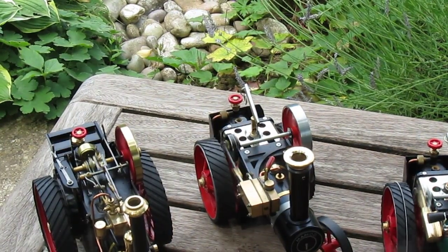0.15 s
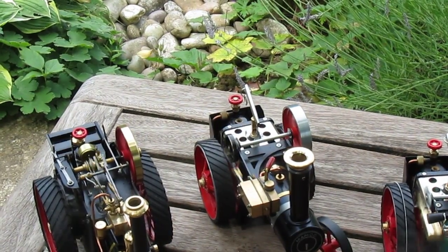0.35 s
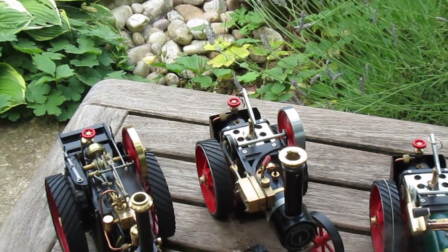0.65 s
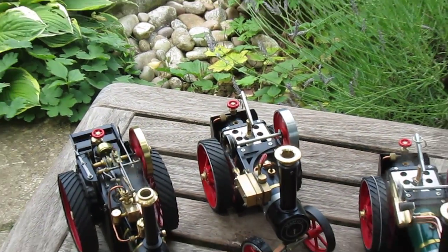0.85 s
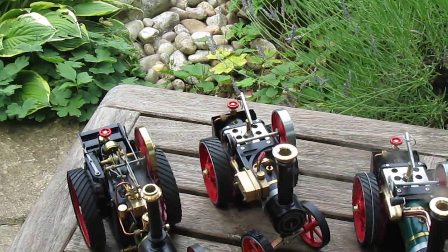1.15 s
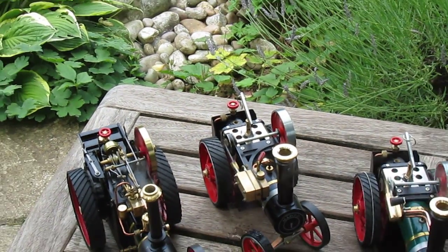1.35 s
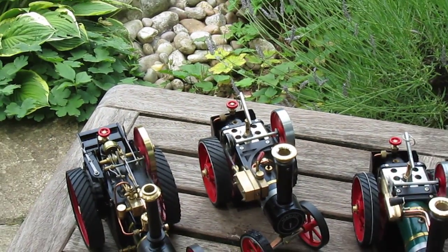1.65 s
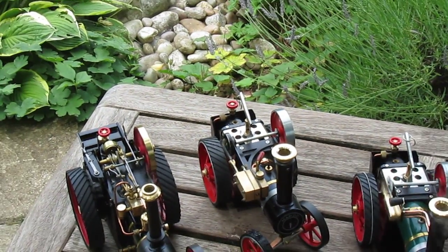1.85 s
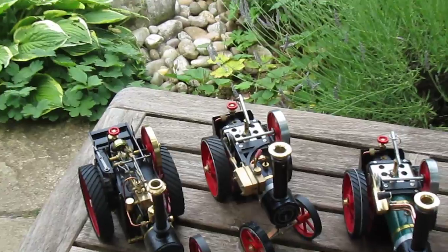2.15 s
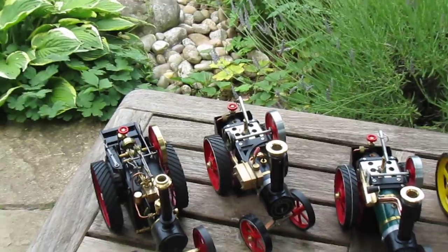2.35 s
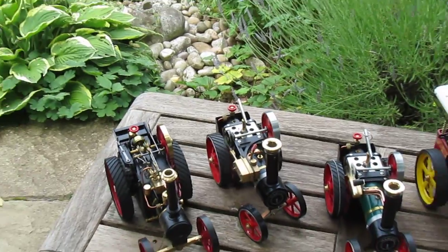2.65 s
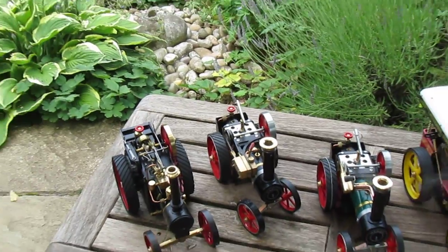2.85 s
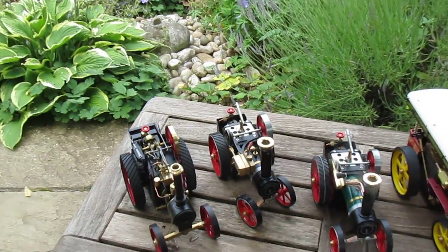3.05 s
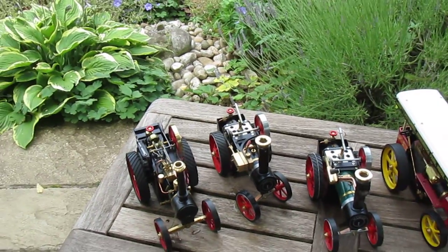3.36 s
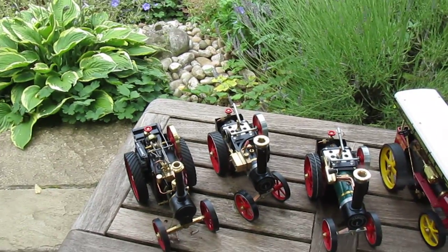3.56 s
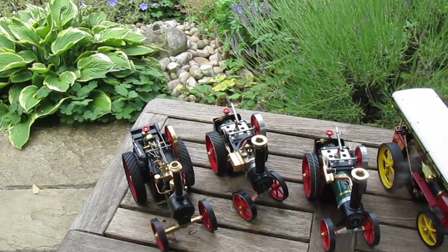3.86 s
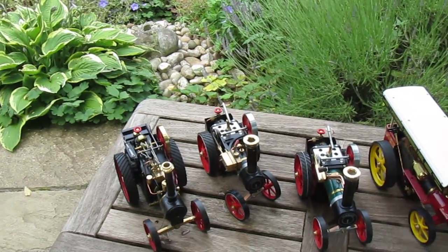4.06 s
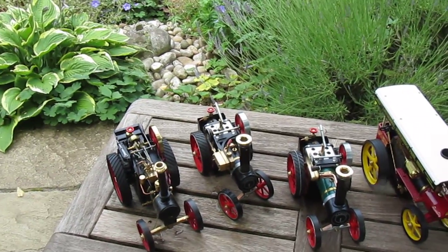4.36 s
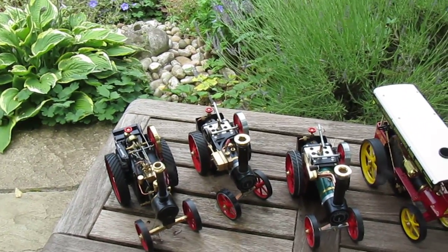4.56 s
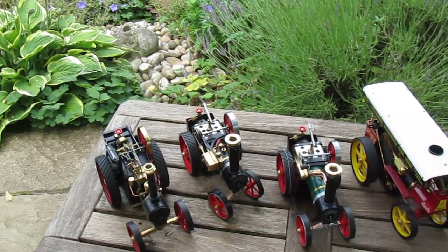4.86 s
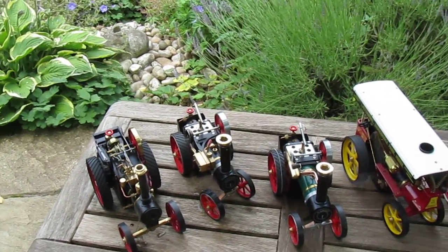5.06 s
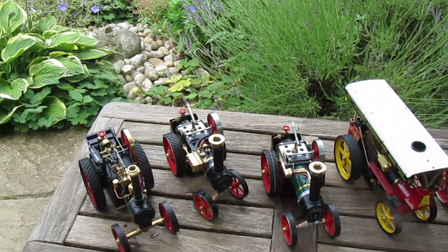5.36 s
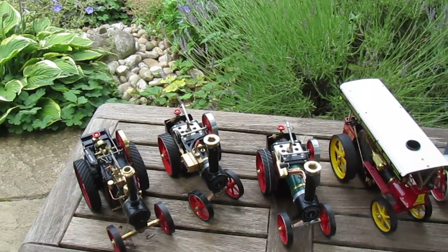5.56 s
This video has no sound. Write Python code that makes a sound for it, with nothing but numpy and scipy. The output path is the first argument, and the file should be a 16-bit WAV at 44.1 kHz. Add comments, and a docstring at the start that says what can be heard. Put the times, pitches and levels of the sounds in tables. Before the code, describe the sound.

Several small steam engines run continuously on a wooden table outdoors, heard close and dry in stereo, leaning slightly right. Their strokes merge into a buzzing metallic rattle: one engine ticks lightly and brightly at about 35 beats a second, another clacks at about 28, over irregular gear chatter, a hollow drone and leaking steam. A stronger steam jet hisses until 0.3 s, from 1.1 to 1.95, softly from 2.75 to 3.2, then steadily from 3.4. A very thin high squeak chirps at 0.15 s, with others at 5.0 and 5.55. Short low wind bumps come around 1.0-1.2 and 1.8-1.9 s; the bass drops out after them and creeps back. From about 3 s the clacking engine speeds up to 32 beats, growing closer and brighter. Hard ringing knocks become frequent, and the boards' low hum swells, changing tone near 4.8 s. Everything is still running at the end.

```python
"""Model steam engines tick over on a slatted table: one clacks, one ticks steadily, the rest blur into rattle,
drone and steam. Thin squeaks come at the start and near the end, and a steam jet hisses on and off. Gusts of
0.97-1.87 s buffet the microphone ports; around them the bass falls and creeps back. From about 3 s the clacking
engine speeds up, its clack still coming forward; the boards' hum swells and changes tone.
Excited resonance makes the sound: impulse trains and noise drive decaying modes and fixed colours."""
import sys
import numpy as np
from scipy import signal
from scipy.fft import rfft, irfft, next_fast_len
from scipy.io import wavfile
from scipy.ndimage import map_coordinates

SR = 44100
rng = np.random.default_rng(int(sys.argv[2]) if len(sys.argv) > 2 else 0)


def persist_wave(psi):
    """Save psi, clipped to +-1, as 16-bit WAV."""
    counts = np.round(np.clip(psi, -1, 1) * 32767).astype(np.int16)
    wavfile.write(sys.argv[1], SR, np.atleast_2d(counts).T)


N = 251370

# speed of the fast engine: t/s, stroke rate/Hz
FAST_SPEED = [(0.0, 28.623), (0.5, 28.557), (1.0, 28.374), (1.5, 29.14), (2.0, 28.705), (2.4, 28.326),
              (2.8, 28.882), (3.2, 29.819), (3.6, 30.222), (4.0, 30.439), (4.4, 31.365), (4.8, 32.093),
              (5.2, 32.358), (5.7, 32.316)]
# common course of the low sounds: t/s, relative level/dB
LOW_COURSE = [(0, -9), (1.052, -4.5), (1.068, -12), (1.3, -19), (1.8, -13.5), (2.2, -20.5), (2.6, -16.5),
              (3, -11), (4, -3.5), (4.7, -0.5), (5.7, 0.5)]
# passage from the first listening place to the last: t/s, share of the way
PLACE_COURSE = [(0, 0), (3, 0), (4.9, 1), (5.7, 1)]


def amp(db):
    """Level definition: amplitude ratio = 10^(dB/20)."""
    return 10 ** (np.asarray(db) / 20)


def unit(x):
    """Normalisation to a mean square of one."""
    return x / np.sqrt(np.mean(x ** 2) + 1e-20)


def along(points, hz):
    """Spectral interpolation: (f/Hz, value) points joined on a logarithmic frequency axis."""
    f, v = np.transpose(points)
    return np.interp(np.log(hz + 1), np.log(f + 1), v)


def curve(rows):
    """Temporal interpolation: (t/s, value) points joined linearly, one value per sample."""
    s, v = np.transpose(rows)
    return np.interp(np.arange(N) / SR, s, v)


def wobble(rate):
    """Band-limited fluctuation: a smooth curve through random knots, rate of them a second."""
    knots = rng.standard_normal(int(N * rate / SR) + 4)
    return map_coordinates(knots, [np.arange(N) * rate / SR])


def filtered(x, response):
    """Convolution theorem: the spectrum of x times a complex response of frequency."""
    m = next_fast_len(N + SR // 2)
    hz = np.fft.rfftfreq(m, 1 / SR)
    return irfft(rfft(x, m) * response(hz), m)[..., :N]


def modes(rows, f, order=1):
    """Modal superposition: causal (f/Hz, width/Hz, level/dB) resonances; higher orders have steeper skirts."""
    return sum((amp(db) * 1j * f * w / (c * c - f * f + 1j * f * w)) ** order for c, w, db in rows)


def stereo(gate, colour):
    """Partial coherence: enveloped noise, coloured, in a mid-side mix that sets the likeness of the ports."""
    # likeness of left and right: f/Hz, correlation coefficient
    likeness = [(60, .5), (130, .8), (290, .82), (640, .96), (1410, .96), (3100, .97), (6800, .76),
                (10000, .62), (15000, .5)]

    def mid_and_side(hz):
        angle = np.arccos(np.clip(along(likeness, hz), -1, 1)) / 2
        return colour(hz) * [np.cos(angle), np.sin(angle)]

    mid, side = filtered(gate * rng.standard_normal((2, N)), mid_and_side)
    return unit(np.array([mid + side, mid - side]))


def metal(own):
    """Source-filter principle: a source's own colour times the shared colour and the frames' resonances."""
    # colour shared by all engines: f/Hz, spectral level/dB
    shared = [(330, -55), (560, -15.5), (690, -2.5), (950, -5), (1460, 2), (1590, -2), (1910, -0.5),
              (2160, -9), (2700, -8.5), (3330, -7.5), (3720, -15), (6140, -10), (11200, -22.5),
              (12800, -20), (15600, -41.5)]
    # brass and steel frames: f/Hz, width/Hz, lift/dB
    frames = [(1297, 7.7, 3), (1437, 11, -5), (1505, 8.7, 2), (1847, 9.9, 5), (1927, 33, 8),
              (2150, 140, -12), (2325, 197, 9), (4436, 9, 5.5), (5640, 330, -6.5), (6080, 86, -2.5),
              (7900, 55, 4), (8040, 71, -19), (8690, 17, 1.5), (12800, 280, -26)]
    return lambda hz: amp(along(shared, hz) + along(own, hz)) * (1 + modes(frames, hz))


def strokes(speed, phases):
    """Phase integration: a unit impulse each time the crank passes a phase, in strokes of a two-stroke turn."""
    travelled = np.cumsum(curve(speed)) / SR  # strokes
    return sum(np.diff(np.floor((travelled - p) / 2), prepend=-1) for p in phases)


def knocking(rate):
    """Frequency-modulated pulse train: impulses about rate a second, unevenly spaced but never bunched."""
    speed = rate * amp(2.5 * wobble(25))
    return np.diff(np.floor(np.cumsum(speed) / SR), prepend=0)


def impulses(rows):
    """Isolated excitation: one impulse per (t/s, strength/dB) row."""
    blows = np.zeros(N)
    for s, db in rows:
        blows[round(s * SR)] = amp(db)
    return blows


def bursts(blows, t60, scatter_db, rise=0.00029):
    """Exponential decay: each blow, at a random strength, starts an envelope; t60 and rise in s."""
    t = np.arange(SR // 20) / SR
    decay = amp(-60 * t / t60) * (1 - np.exp(-t / rise))
    sized = blows * amp(scatter_db * rng.standard_normal(N))
    return np.abs(signal.fftconvolve(sized, decay)[:N])


def ringing(blows, scatter_db, rise=0.0027):
    """Free vibration: each blow rings the bed plate's modes, each at a random strength and sign."""
    # engine bed plate: f/Hz, level/dB, t60/s
    bed_plate = [(1420, -7, .028), (1840, -2, .034), (2050, 0, .026), (2350, -8, .022)]
    t = np.arange(SR // 15) / SR
    total = np.zeros(N)
    for hz, db, t60 in bed_plate:
        strength = amp(scatter_db * rng.standard_normal(N)) * rng.choice([-1, 1], N)
        envelope = amp(db - 60 * t / t60) * (1 - np.exp(-t / rise))
        mode = envelope * np.sin(2 * np.pi * hz * t)
        total += signal.fftconvolve(blows * strength, mode)[:N]
    return total


def wind():
    """Turbulent pressure: eddies press on one port and pull on the other, in gusts over a light breeze."""
    # gusts on the ports: t/s, level/dB
    gusts = [(.97, -29), (1.11, -40), (1.17, -35), (1.77, -46), (1.865, -37)]
    # colour of the buffeting: f/Hz, spectral level/dB
    buffet = [(20, -18), (45, -3), (80, -1), (150, 1.5), (300, -3), (900, -34)]
    gust_s = .022  # time constant on each side of a gust
    breeze_db, breeze_follows = -48, .8  # level at 0 dB of the lows; dB per dB of the lows
    t = np.arange(N) / SR
    breeze = amp(breeze_db + breeze_follows * curve(LOW_COURSE))
    push = breeze + sum(amp(db) * np.exp(-np.abs(t - s) / gust_s) for s, db in gusts)
    opposed, alike = filtered(rng.standard_normal((2, N)), lambda hz: amp(along(buffet, hz)))
    return push * unit(np.array([opposed + .4 * alike, .4 * alike - opposed]))


def squeaks():
    """Tone burst: short thin sines under Gaussian envelopes, off to one side."""
    # squeaks: t/s, level/dB (peak, before the two side gains), f/Hz
    squeak_rows = [(.145, -43, 11420), (.755, -73, 11420), (5.03, -45, 11500), (5.555, -54, 11430)]
    t = np.arange(N) / SR
    tone = sum(amp(db) * np.exp(-((t - s) / 0.015) ** 2) * np.sin(2 * np.pi * hz * t)
               for s, db, hz in squeak_rows)
    return tone * np.array([[1.3], [-.3]])  # left, right


def table():
    """Forced vibration: the boards shake, and hum where an overtone of the stroke rate meets a mode."""
    # board modes: f/Hz, width/Hz, level/dB at the first place, level/dB at the last
    boards = [(64, 16, -16, -11), (113, 14, -3.5, -9), (127, 12, -3, -3), (150, 24, -.5, -4),
              (170, 20, -4, -6), (194, 9, -2, -.5), (222, 20, -5, -1), (258, 18, 0, -5),
              (288, 18, .5, -1.5), (318, 22, 0, -2.5), (345, 20, -2, -6), (452, 20, -9, -4)]
    # change of the boards' tone: t/s, share of the way
    settling = [(0, 0), (3, 0), (4.79, .45), (4.86, 1), (5.7, 1)]
    # hum of the boards: t/s, level/dB
    hum_level = [(0, -45), (1.05, -44), (1.1, -49), (1.5, -51.5), (2.1, -53.5), (2.6, -50), (3.2, -43),
                 (4, -37), (4.78, -39), (4.86, -38.5), (5.7, -37.5)]
    # shaking under all the engines: f/Hz, spectral level/dB
    rumble_colour = [(25, -45), (60, -26), (100, -18.5), (130, -19), (200, -11), (300, -9), (420, -4.5),
                     (550, -1.5), (900, -9), (1500, -46)]
    rumble_db = -29  # at 0 dB of the lows
    jolts = strokes(FAST_SPEED, (.4, 1.4)) * amp(1.5 * wobble(6))  # from the fast piston
    hz, width, *places = np.transpose(boards)
    first, last = [unit(filtered(jolts, lambda f: modes(zip(hz, width, db), f, order=2))) for db in places]
    way = curve(settling)
    hum = (1 - way) * first + way * last
    rumble = stereo(1, lambda f: amp(along(rumble_colour, f)))
    return amp(curve(hum_level)) * hum + amp(rumble_db + curve(LOW_COURSE)) * rumble


def leaking():
    """Valve gating: gain of the steam jet, opening and closing with soft edges."""
    # jet of steam: start t/s, end t/s, level/dB
    leaks = [(-.1, 0.274, -39), (1.12, 1.954, -39), (2.754, 3.175, -44), (3.375, 5.8, -37)]
    edge_s = 0.0036
    t = np.arange(N) / SR
    return sum(amp(db) * (np.tanh((t - a) / edge_s) - np.tanh((t - b) / edge_s)) for a, b, db in leaks) / 2


def blur():
    """Amplitude modulation: loose knocks and gear chatter modulate rattle, steam and a boiler-shell drone."""
    # rattle of the other engines: t/s, level/dB
    running = [(0, -29), (.24, -30), (.3, -31.5), (1.12, -32), (1.2, -31.5), (1.55, -31), (2.02, -30.5),
               (2.1, -33), (2.7, -31.5), (3.33, -32), (3.4, -28), (3.55, -31), (4.45, -30.5), (4.62, -28.5),
               (4.8, -30.5), (5.3, -29.5), (5.7, -28.5)]
    # hollow boiler shell: f/Hz, width/Hz, level/dB
    boiler = [(625, 60, -2), (684, 28, 0), (742, 60, -3.5), (850, 60, -8)]
    # own colours of rattle, weak leak and jet: f/Hz, relative level/dB
    rattle_colour = [(300, -47), (600, 5.5), (3000, 0), (4500, -19.5), (9000, -41)]
    steam_colour = [(1500, -38), (3000, -4), (4400, -0.5), (6000, 0.5), (9000, 1), (15000, -6)]
    jet_colour = [(1500, -32), (3000, 0.5), (4300, 9.5), (5500, 5), (9000, -14), (15000, 5)]
    drone_db, drone_follows = -28, 1.4  # level at 0 dB of the lows; dB per dB of the lows
    steam_db, steam_follows = -35, 0.86  # mean level of the weak leak; dB per dB of rattle
    gear_ring_db = -10  # ring of the gear teeth, relative to the rattle
    rattle_level = curve(running)
    drone_level = drone_db + drone_follows * curve(LOW_COURSE)
    steam_level = steam_db + steam_follows * (rattle_level - rattle_level.mean())

    knocks = bursts(knocking(25), t60=.045, scatter_db=2, rise=.002)  # a third engine
    teeth = knocking(80)
    chatter = bursts(teeth, t60=.02, scatter_db=2.5)
    spits = bursts(rng.random(N) < 150 / SR, t60=.015, scatter_db=3)

    drone_gate = (1 + 0.63 * knocks + 0.5 * chatter) * amp(2.5 * wobble(7))
    # magnitudes are summed, so neighbouring shell modes never cancel
    drone = stereo(drone_gate, lambda hz: sum(np.abs(modes([mode], hz, order=2)) for mode in boiler))
    rattle = stereo(1 + .6 * knocks + chatter, metal(rattle_colour))
    rattle = rattle + amp(gear_ring_db) * unit(ringing(teeth, scatter_db=2.5, rise=.0015))
    steam = stereo(1 + 0.95 * knocks + 1.1 * chatter + .5 * spits, metal(steam_colour))
    jet = stereo(1 + 1.5 * chatter, metal(jet_colour))
    return amp(drone_level) * drone + amp(rattle_level) * rattle + amp(steam_level) * steam + leaking() * jet


def even_engine():
    """Periodic impact: the valve gear ticks lightly and brightly, twice a turn, unevenly spaced."""
    # speed of the steady engine: t/s, stroke rate/Hz
    speed = [(0.0, 35.071), (1.0, 35.042), (2.0, 34.643), (3.0, 34.742), (4.0, 34.77), (5.0, 34.65),
             (5.7, 35.277)]
    # where the parts meet: two positions in a two-stroke turn/strokes
    phases = (.46, 1.53)
    # own colour of the tick: f/Hz, relative level/dB
    tick_colour = [(4000, -42), (6500, 2), (8500, -2), (10200, 6.5), (11500, 0.5), (12800, 4), (15000, -3)]
    tick_db, change_db = -41.5, -5.5  # at the first place; change by the last
    blows = strokes(speed, phases)
    gate = bursts(blows, t60=0.015, scatter_db=4.5) + 0.31 * bursts(blows, t60=0.18, scatter_db=6.0)
    return amp(tick_db + change_db * curve(PLACE_COURSE)) * stereo(gate, metal(tick_colour))


def hard_knocks():
    """Impact excitation: now and then a part slams home harder, or a loose one clacks brightly."""
    # knocks that stand out: t/s, strength/dB
    hard = [(0.1311, -18), (0.179, -18), (0.5836, -21), (1.2106, -19), (1.2471, -19), (1.293, -19),
            (1.3703, -18), (2.0018, -20), (2.0383, -19), (2.7372, -21), (2.8759, -22), (2.9816, -20),
            (3.031, -19), (3.4146, -18), (3.457, -18), (3.6142, -23), (3.6471, -22), (3.716, -21),
            (3.8327, -22), (3.8766, -18), (3.916, -20), (4.0647, -20), (4.1101, -20), (4.1445, -19),
            (4.1804, -17), (4.3061, -18), (4.3984, -20), (4.4094, -18), (4.4338, -19), (4.592, -18),
            (4.8693, -19), (5.0863, -18), (5.1477, -18), (5.4066, -18), (5.459, -17), (5.5423, -15)]
    # loose bright clacks: t/s, strength/dB
    loose = [(2.46, -13), (3.115, -13), (3.8791, -10), (4.556, -12)]
    ring_db, crack_db, snap_db = -6, -49, -50  # gains of the three parts
    blows = impulses(hard)
    crack_gate = bursts(blows, t60=.025, scatter_db=1)
    crack = stereo(crack_gate, metal([(800, -20), (2000, 18), (4000, 13.5), (9000, 1.0)]))
    snap_gate = bursts(impulses(loose), t60=.025, scatter_db=1)
    snap = stereo(snap_gate, metal([(800, -2), (2000, -4), (4000, 4), (9000, 3)]))
    ring = ringing(blows, scatter_db=1, rise=.0035)
    return amp(ring_db) * ring + amp(crack_db) * crack + amp(snap_db) * snap


def fast_engine():
    """Repeated impact: slack rods clack at each stroke; the frame knocks and rings, again on the return."""
    # where the parts meet: two positions in a two-stroke turn/strokes
    phases = (.405, 1.395)
    # the clack comes forward: t/s, level/dB
    clack_level = [(0, -61), (1.3, -40.5), (2.6, -38.5), (4.4, -35), (5.7, -32.5)]
    # ring of the bed plate: t/s, level/dB
    ring_level = [(0, -39), (2, -38.5), (3.4, -37), (3.85, -32.5), (4.58, -32.5), (4.63, -45), (4.8, -43),
                  (4.85, -32), (5.7, -32)]
    # own colours of clack and knock: f/Hz, relative level/dB
    clack_colour = [(2500, -52), (4000, 6.5), (5500, 8), (8000, 14), (10000, 12), (14000, 3)]
    knock_colour = [(600, -5), (1200, 11), (1700, -30), (2000, 8), (2500, -12), (3200, 2), (4500, 6),
                    (7000, -22)]
    knock_db = -6.5  # frame knock relative to the ring
    blows = strokes(FAST_SPEED, phases)
    back = strokes(FAST_SPEED, np.add(phases, .41))  # the return, .41 stroke later
    clack = bursts(blows, t60=.03, scatter_db=3) + .23 * bursts(blows, t60=.19, scatter_db=2)
    knock = bursts(blows, t60=.035, scatter_db=2, rise=.0035)
    knock = knock + .35 * bursts(back, t60=.025, scatter_db=3, rise=.0015)
    ring = unit(ringing(blows + .35 * back, scatter_db=1.5, rise=.003))
    ring_db = curve(ring_level)
    return (amp(curve(clack_level)) * stereo(clack, metal(clack_colour))
            + amp(knock_db + ring_db) * stereo(knock, metal(knock_colour))
            + amp(ring_db) * ring)


def scene():
    """Superposition: the engines lean to one side by a level difference; squeaks and wind are added."""
    lean_db, change_db = -2.1, .85  # left minus right at the first place; change by the last
    lean = (lean_db + change_db * curve(PLACE_COURSE)) / 2
    engines = table() + blur() + even_engine() + hard_knocks() + fast_engine()
    return engines * amp([lean, -lean]) + squeaks() + wind()


def bass_share():
    """Exponential relaxation: the bass gain falls fast at each drop, waits, and creeps back."""
    # drops of the bass: t/s, gain aimed at/dB
    drops = [(1.06, -3), (1.19, -38), (1.89, -38)]
    fall_s, hold_s, return_s = .014, .1, .33  # time constant down, wait from the start, time constant back
    s, db = np.transpose(drops)[..., None]
    since = np.maximum(np.arange(N) / SR - s, 0)
    lost = (1 - np.exp(-since / fall_s)) * np.exp(-np.maximum(since - hold_s, 0) / return_s)
    return np.prod(1 - (1 - amp(db)) * lost, axis=0)


def record(dry):
    """Interference: bass and treble paths meet partly out of phase; the dip climbs with the bass share."""
    split_hz, top_hz = 560, 15750  # crossover; band limit
    delay_s = .8e-5  # between ports a few millimetres apart

    def damping(hz):
        return split_hz ** 2 - hz * hz + 1j * np.sqrt(2) * hz * split_hz

    def ports(hz):
        late = np.exp(-1j * np.pi * hz * delay_s * np.array([[1], [-1]]))
        return late * (hz < top_hz)

    low = filtered(dry, lambda hz: -split_hz ** 2 / damping(hz) * np.exp(-.3j))  # phase turned by .3 rad
    high = filtered(dry, lambda hz: hz * hz / damping(hz))
    return filtered(high + bass_share() * low, ports)


dry = scene()
out = record(dry)
persist_wave(out)
```